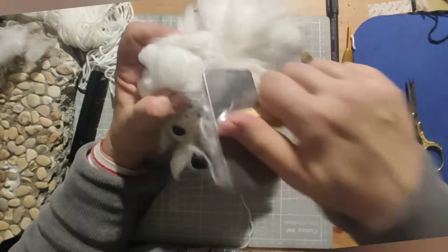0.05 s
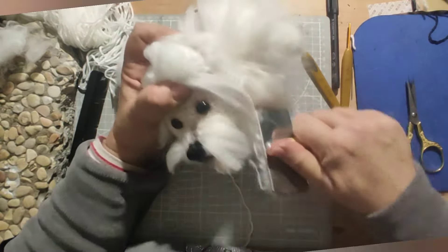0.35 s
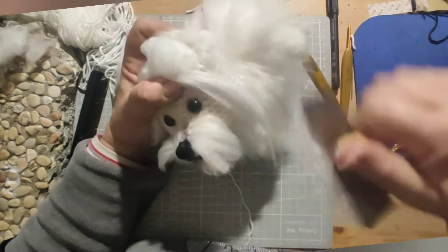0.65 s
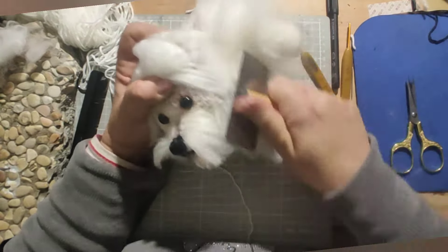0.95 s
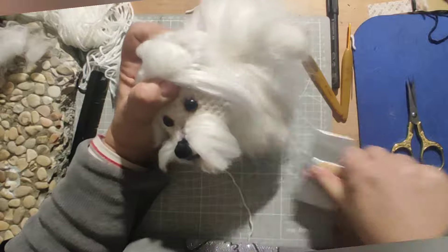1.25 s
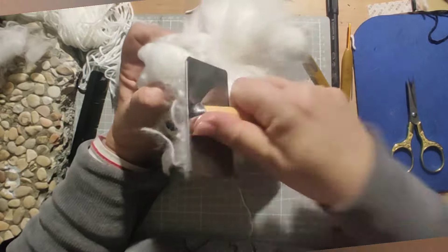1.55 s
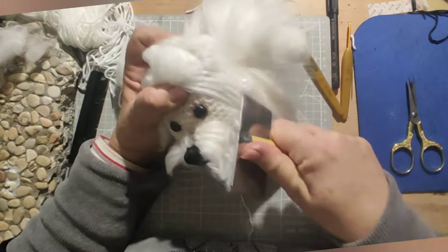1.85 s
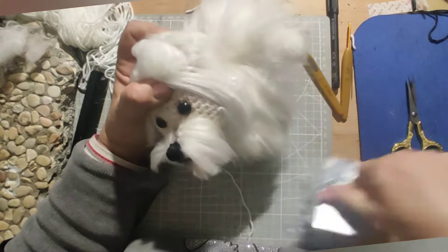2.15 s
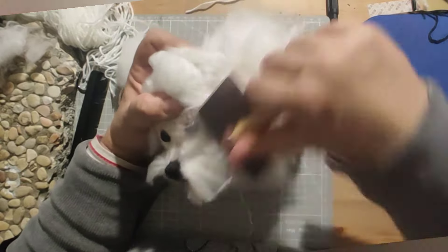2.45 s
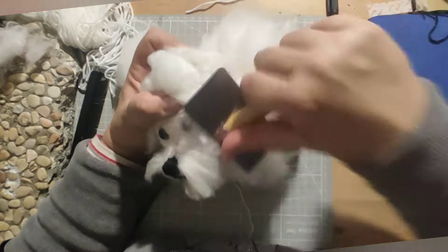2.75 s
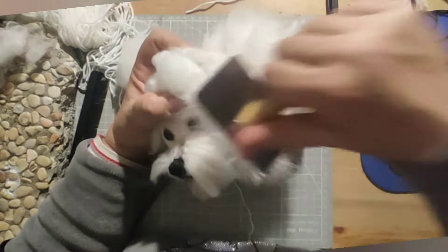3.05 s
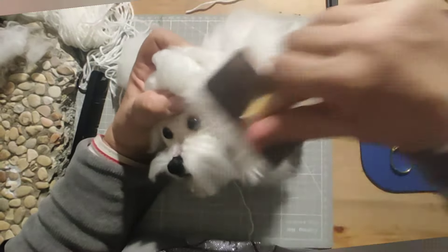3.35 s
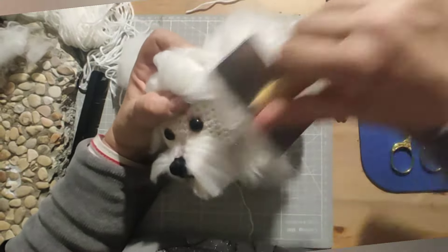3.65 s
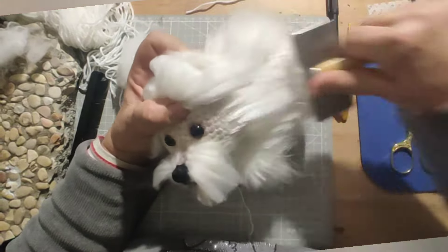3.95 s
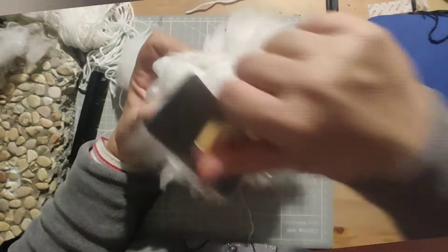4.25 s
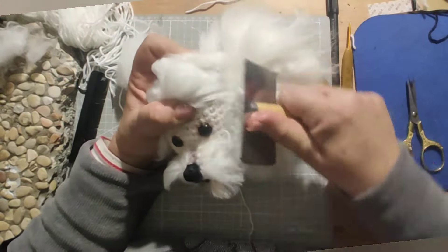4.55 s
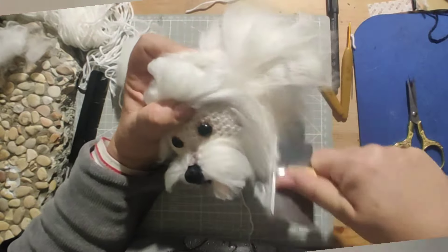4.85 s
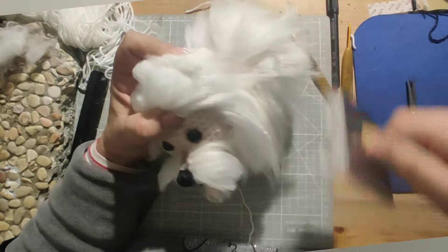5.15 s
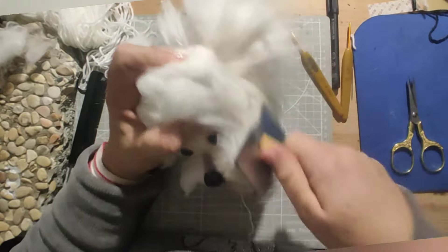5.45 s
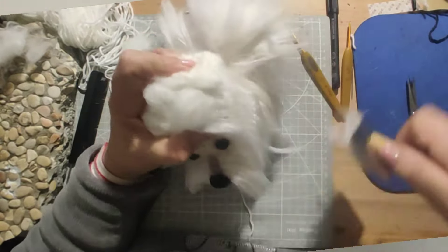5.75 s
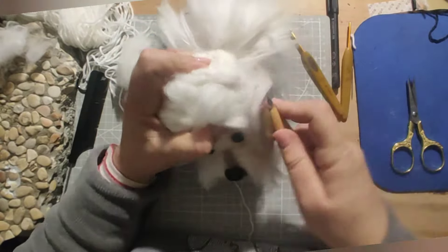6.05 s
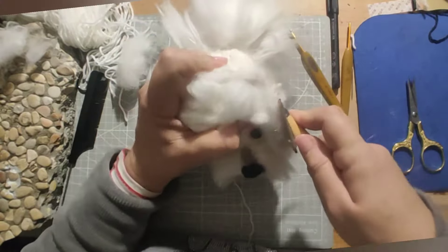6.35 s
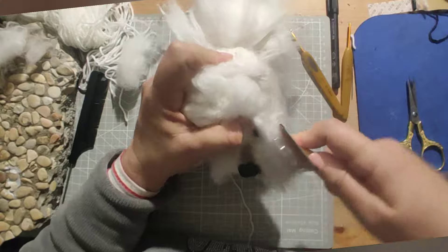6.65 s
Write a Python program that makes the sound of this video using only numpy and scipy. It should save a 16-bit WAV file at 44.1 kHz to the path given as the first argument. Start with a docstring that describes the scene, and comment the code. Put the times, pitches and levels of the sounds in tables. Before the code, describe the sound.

A wire brush rakes again and again through the yarn hair of a toy dog. Each short stroke is a bright, dense crackle over a dry rasp, with tiny snaps as the pins catch and spring free. The strokes are sharpest midway, then turn sparser and lighter. Between them, yarn rustles in the hand and a sleeve swishes softly. The microphone is close, in a small room with a faint fan hum.

```python
"""Slicker brush on a toy dog

Close above a table in a small room, a wire brush rakes again and again through a toy's yarn hair.
Hundreds of pins catch and release fibres: a dense crackle over a rasp, with snaps where a strand holds.
Yarn rustles in the hand, a sleeve swishes and a fan hums; the microphone's two ports ring near 8 kHz."""
import sys
import numpy as np
from scipy import signal
from scipy.fft import rfft, irfft
from scipy.io import wavfile
from scipy.ndimage import uniform_filter1d

SR = 44100
rng = np.random.default_rng(int(sys.argv[2]) if len(sys.argv) > 2 else 0)


def inscribe(sig):
    """Save sig as 16-bit PCM at rate SR to the path in sys.argv[1].

    A 1-D sig is mono; a 2-D sig holds one channel per row.
    Samples are clipped to [-1, 1] before scaling.
    """
    pcm = np.round(np.clip(np.atleast_2d(sig).T, -1, 1) * 32767)
    wavfile.write(sys.argv[1], SR, pcm.astype(np.int16))


N = 300321
TIME = np.arange(N) / SR
STEPS = np.arange(0, N / SR + .002, .001)  # millisecond grid for the strokes
FFT_SIZE = 307200
FREQS = np.maximum(np.arange(FFT_SIZE // 2 + 1) * SR / FFT_SIZE, 1)

# Pulls of the brush. Each row: start and length in seconds, relative level at the bite and at the end
# in dB, run-out in seconds, rasp and pull offsets in dB, wrist speed from 0 (comb) to 1 (flick),
# leftward lean, wire singing offset in dB, seconds the pins take to sink in.
STROKES = [ (0.122, 0.042, -40, -46.5, .018, -6, -12, 0.04, -14, -38, 0.026),
           (0.212, 0.12, -32, -39, 0.12, -2.5, -15, 0.23, -5, -37, 0.037),
           (0.338, 0.11, -38, -44.5, 0.06, -1, -11.5, 0.28, -7, -44, 0.032),
           (0.419, 0.09, -41, -43, 0.017, -9, -10.5, 0.5, -14, -35, 0.027),
           (0.891, 0.11, -34.5, -36.5, 0.07, -9, -15, 0.2, -10.5, -12, 0.027),
           (1.011, 0.23, -45.5, -35.5, 0.03, -6, -10, 0, -11, -26, 0.022),
           (1.141, 0.12, -32.5, -30, 0.041, -11, -21, 0.29, -7, -31, 0.034),
           (1.614, 0.16, -38.5, -38.5, 0.083, -11, -28, 0.07, -9, -5, 0.03),
           (1.763, 0.16, -46.5, -30.5, 0.09, -7, -16.5, 0.25, -8.5, -24, 0.02),
           (1.994, 0.077, -42.5, -43, 0.031, -6, -19, 0, -10, -30, .031),
           (2.489, 0.063, -29.5, -29.5, 0.069, -11, -16.5, 0.75, -9, -26, 0.034),
           (2.818, 0.059, -25, -24, 0.072, -12.5, -17.5, 0.48, 0, -35, 0.03),
           (3.158, 0.065, -26.5, -26, 0.075, -10, -18.5, 0.82, 2.5, -37, .031),
           (3.467, 0.094, -32.5, -27, 0.055, -9.5, -17.5, 0.6, 7, -35, 0.038),
           (3.799, 0.13, -33, -27.5, 0.082, -9.5, -17, 0.5, 5.5, -33, 0.027),
           (4.098, 0.051, -59, -51, 0.036, 2, -9, 0.02, -12, -30, 0.035),
           (4.352, 0.22, -38, -43.5, .04, -6.5, -17.5, 0.1, 1, -2, 0.031),
           (4.483, 0.21, -32.5, -38.5, 0.14, -8.5, -15, 0.1, -5, -6.5, 0.025),
           (4.803, 0.15, -44, -51.5, 0.072, -3, -4.5, 0, -6, -32, 0.022),
           (5.397, .113, -40, -35.5, .09, -7.5, -11.5, .85, -2.5, -36, .031),
           (6.125, 0.19, -61, -39, 0.099, -5, -11.5, 1, 1, -35, 0.023),
           (6.288, 0.19, -45.5, -38.5, 0.047, -7, -13, 0.74, 5, -35, .031),
           (6.433, 0.081, -37.5, -38.5, 0.049, -15, -16.5, 0.55, 3, -35, .031),
           (6.548, 0.1, -34.5, -43, 0.073, -12.5, -11.5, 0.53, 2, -35, 0.045),
           (6.688, 0.12, -60, -45.5, 0.04, -11, -18, 0.8, -10, -35, .031), ]


def from_db(db):
    """Decibels to gain."""
    return 10 ** (np.asarray(db) / 20)


def rms_one(x):
    """Scale to an rms of one."""
    return x / np.sqrt(np.mean(x ** 2) + 1e-20)


def in_time(rows):
    """Each column of a curve at every sample."""
    times, *columns = np.transpose(rows)
    return [np.interp(TIME, times, column) for column in columns]


def over_hz(points):
    """A spectrum table at every frequency."""
    hz, values = np.transpose(points)
    return np.interp(np.log(FREQS), np.log(hz), values)


def white():
    """Two independent white noises."""
    return rng.standard_normal((2, N))


def drift(rate_hz):
    """A smooth random wander with a spread of one."""
    hop, settle = 40, 2000
    pole = np.exp(-2 * np.pi * rate_hz * hop / SR)
    noise = rng.standard_normal(N // hop + settle + 2)
    slow = signal.lfilter([1], [1, -2 * pole, pole * pole], noise)[settle:]
    return np.interp(np.arange(N) / hop, np.arange(len(slow)), rms_one(slow))


def wavering_tone(hz, spread_hz, rate_hz):
    """A sine of rms one whose pitch wanders."""
    return np.sqrt(2) * np.sin(2 * np.pi * np.cumsum(hz + spread_hz * drift(rate_hz)) / SR)


def swell(at_s, half_s):
    """A smooth rise and fall around one moment."""
    return np.exp(-np.minimum(((TIME - at_s) / half_s) ** 2, 30))


def impulses(rows):
    """One impulse for each row of seconds and dB."""
    out = np.zeros(N)
    for at_s, db in rows:
        out[round(at_s * SR)] = from_db(db)
    return out


def narrow_hiss(pitch, width_hz):
    """A thin band of noise that follows a pitch; rms one."""
    lowpass = signal.butter(2, width_hz, fs=SR, output="sos")
    real, imag = signal.sosfilt(lowpass, rng.standard_normal((2, 2, N)))
    return rms_one(np.real((real + 1j * imag) * np.exp(2j * np.pi * np.cumsum(pitch) / SR)))


def panned(db):
    """Left and right gains, the left louder by db, that keep the total power."""
    gains = from_db(np.array([db, -db]) / 2).reshape(2, -1)
    return gains / np.sqrt(np.mean(gains ** 2, axis=0))


def resonance(hz, width_hz, db):
    """Response of one resonant boost."""
    return 1 + (from_db(db) - 1) / (1 + 1j * (FREQS / hz - hz / FREQS) * hz / width_hz)


def port_response(left_lag_s=0.00018):
    """Each microphone port rings at its own pitch; the left one hears the work slightly later."""
    # The left port, then the right. Each row: pitch and width in Hz, boost in dB.
    ports = [(8390, 860, 18), (7473, 700, 22)]
    # Stereo balance. Each row: frequency in Hz, left over right in dB.
    balance = [(60, 5.7), (250, 9.2), (500, 6), (1000, 3.7), (2000, 1.6), (3500, 0.89), (5500, 2),
               (8500, 3.3), (14000, 1.8)]
    response = np.array([resonance(*port) for port in ports]) * panned(over_hz(balance))
    response[0] *= np.exp(-2j * np.pi * FREQS * left_lag_s)
    return response


def pickup(pair, spectrum):
    """Colour a shared and an unshared signal and hear them through the two ports; mid rms one."""
    # How alike the ports hear. Each row: frequency in Hz, likeness from 0 to 1.
    likeness = [(100, 0.62), (500, 0.71), (2000, 0.86), (7500, 0.066), (14000, 0.08)]
    alike = over_hz(likeness)
    shared, apart = rfft(pair, FFT_SIZE)
    sides = np.sqrt(1 + alike) * shared + np.sqrt(1 - alike) * apart * [[1], [-1]]
    out = irfft(sides * port_response() * from_db(over_hz(spectrum)), FFT_SIZE)[:, :N]
    return out / np.std(out.mean(axis=0))


def fan():
    """A fan off to the left: low noise and wavering tones."""
    # Its noise, then its tones. Each row: frequency in Hz, relative level in dB.
    colour = [(29, -40), (50, -28), (102, -19), (193, 0), (226, 0), (257, -4.5), (280, -3.5), (356, -4),
              (388, -16.5), (501, -5), (538, -10), (837, -23), (1050, -24.5), (1260, -18), (1500, -43),
              (1950, -28), (3300, -120)]
    tones = [(258.4, -62.5), (511.4, -70), (1109, -96)]
    noise = from_db(-58.5) * pickup(white(), colour)
    hum = sum(from_db(db + drift(1)) * wavering_tone(hz, spread_hz=2.69, rate_hz=9.3)
              for hz, db in tones)
    return noise + from_db(1.5) * hum * panned(10)


def air(draught_db=-68.5, half_puff_s=0.063):
    """Air stirs at the microphone, and the hand pushes puffs at it."""
    # Puffs. Each row: time in seconds, relative level in dB.
    puffs = [(2.55, -55), (2.925, -49), (3.265, -49), (3.53, -56), (3.825, -52), (3.99, -47), (5.765, -63)]
    # Their rumble. Each row: frequency in Hz, relative level in dB.
    colour = [(10, 4), (22, -10), (42, 1), (60, -6.5), (90, -19), (200, -12), (1000, -87)]
    gusts = sum(from_db(db) * swell(at_s, half_puff_s) for at_s, db in puffs)
    return (from_db(draught_db) + from_db(-8.5) * gusts) * pickup(white(), colour)


def crackle(per_s, spread_db, hiss):
    """Fibres slip off pins at random, with uneven strength, over smooth friction."""
    slips = rng.random((2, N)) < per_s / SR
    sizes = from_db(spread_db * np.minimum(rng.exponential(1, (2, N)), 4))
    signs = rng.choice([-1, 1], (2, N))
    return rms_one(slips * sizes * signs / np.sqrt(per_s)) + hiss * white()


def yarn_rustle():
    """Loose fibres rub softly under the fingers of the holding hand."""
    # The yarn shifting. Each row: time in seconds, level in dB.
    levels = [(0, -63.5), (.55, -50.5), (1.55, -55.5), (2.45, -54), (2.72, -65.5), (2.8, -77), (3.0, -56),
              (3.3, -55), (3.42, -65.5), (4.1, -53.5), (4.32, -65.5), (4.8, -51.5), (5.08, -76),
              (5.33, -61), (5.68, -55.5), (5.97, -62.5), (6.1, -63), (6.81, -52)]
    # Its rustle. Each row: frequency in Hz, relative level in dB.
    colour = [(300, 11), (750, 15), (1300, 14.5), (2500, 13), (4200, 8.5), (6000, 7.5), (7800, 1.5),
              (9400, 1), (10800, -18), (13000, -8), (15000, -37)]
    gain = from_db(in_time(levels)[0] + 1.7 * drift(16))
    return gain * pickup(crackle(1500, spread_db=5, hiss=3), colour)


def stroke_db(build_db, tips_db):
    """Level of each stroke: the pins graze, bite, drag, let go and run out through the loose tips."""
    graze_s, graze_db = 0.015, -23.5
    let_go_db_per_s, run_out_fall_db = 754, 11.5
    start, length, first_db, last_db, run_out, _, _, flick, _, _, bite_s = np.array(STROKES).T[..., None]
    age = STEPS - start
    after = np.maximum(age - length, 0)
    done = np.clip(age / length, 0, 1)
    graze = from_db(graze_db) * flick * (age > -graze_s)
    bite = (np.maximum(age, 0) / bite_s) ** 2
    attack = 20 * np.log10(np.minimum(graze + bite, 1) + 1e-6)
    drag = first_db + (last_db - first_db) * done + build_db * (done - .5)
    release = np.maximum(-let_go_db_per_s * after, tips_db - run_out_fall_db * (after / run_out) ** 2)
    return np.maximum(attack + drag + release, -200)


def stroke_controls():
    """Four gains, wrist speed and lean; the pull builds as the yarn tightens, dull sounds linger."""
    start, length, _, _, _, rasp_db, pull_db, flick, lean, sing_db, _ = np.array(STROKES).T[..., None]
    scratch = from_db(stroke_db(build_db=0, tips_db=-13))
    rasp = from_db(stroke_db(build_db=0, tips_db=-5) + rasp_db)
    pull = from_db(stroke_db(build_db=5, tips_db=-3) + pull_db)
    singing = scratch * from_db(sing_db)
    leaving = np.clip((STEPS - start) / length - .5, 0, 1)
    lean = lean + 6 * (leaving - .2)  # swings left as the brush leaves the tuft
    share = scratch ** 2 / np.sum(scratch ** 2, axis=0)  # the loudest stroke leads
    gains = [gain.max(axis=0) for gain in (scratch, rasp, pull, singing)]
    motion = [np.sum(share * value, axis=0) for value in (flick, lean)]
    return [np.interp(TIME, STEPS, control) for control in gains + motion]


def brushing(scratch_gain, rasp_gain, pull_gain, flick, lean):
    """A harder stroke frees more fibres a second; a quicker one is denser and brighter."""
    # Slow and quick pin scratch, fibre rasp and pull on the tuft.
    # Each row: frequency in Hz, relative level in dB.
    slow_colour = [(2500, -61), (4500, -7), (5600, -2.5), (6800, 8.5), (8500, 3.5), (9400, -2),
                   (10800, -91), (12500, -27), (15000, -39)]
    quick_colour = [(2500, -34.5), (4500, -56), (5600, -34), (6800, 8), (8500, 9), (9400, 4.5), (10200, -7),
                    (11000, -20), (15000, -10)]
    rasp_colour = [(700, -36), (1300, -4), (2100, -1.5), (2600, 2.5), (3500, -0.5), (4600, -3),
                   (6000, -5.5), (9000, -33)]
    pull_colour = [(100, -16), (250, 1), (480, 0), (800, 2), (1200, -5), (1800, -47), (4000, -33)]
    per_s = 2200 * (1 + flick) * np.maximum(scratch_gain / from_db(-35.5), .03) ** .6
    slips = crackle(per_s, spread_db=1.6, hiss=0.35)
    clumps = from_db(1.3 * drift(110) + 0.6 * drift(12))  # rows of pins bite together
    pins = (1 - flick) * pickup(slips, slow_colour) + flick * pickup(slips, quick_colour)
    scratch = scratch_gain * from_db(-4) * pins * panned(0.63 * lean + 0.71)
    rasp = rasp_gain * from_db(-1) * pickup(slips + 0.48 * white(), rasp_colour) * panned(0.038 * lean)
    pull = pull_gain * from_db(-5) * pickup(slips + 1.33 * white(), pull_colour)
    return clumps * (scratch + rasp + pull)


def wires(singing):
    """Pins bent by a taut strand ring together near 6 kHz."""
    # Their ring. Each row: frequency in Hz, relative level in dB.
    colour = [(4600, -42), (5500, 2), (6100, 8), (6600, 3), (7200, 1.5), (8200, -22), (11000, -55)]
    return singing * pickup(crackle(2200, spread_db=-3, hiss=0.21), colour)


def changing_pins(x, depth_db):
    """Other pins touch from moment to moment, so narrow bands swell and fade."""
    cells = signal.stft(x, nperseg=256)[2]
    flicker = uniform_filter1d(rng.standard_normal(cells.shape[1:]), size=14, axis=1)
    flicker = rms_one(uniform_filter1d(flicker, size=3, axis=0))
    return signal.istft(cells * rms_one(from_db(depth_db * flicker)))[1][:, :N]


def hollow(x, width_hz=200):
    """The air behind the pin cushion rings at two pitches that move as the brush tilts."""
    # The upper resonance. Each row: time in seconds, pitch in Hz, boost in dB.
    tilts = [(.3, 2300, -1), (1.2, 2200, 4), (1.9, 2040, 4), (2.55, 2150, 4.5), (2.87, 2100, 6),
             (3.22, 2260, 5), (3.55, 1900, 7.5), (3.9, 1930, 2), (4.5, 2150, 5), (6.4, 2850, 3)]
    hz, boost_db = in_time(tilts)
    for pitch_ratio, boost_share in (1, 1), (0.627, 0.5):
        turn = np.exp(2j * np.pi * np.cumsum(pitch_ratio * hz) / SR)
        pole = np.exp(-np.pi * pitch_ratio * width_hz / SR)
        ring = 2 * np.real(turn * signal.lfilter([1 - pole], [1, -pole], x / turn + 1e-18))
        x = x + (from_db(boost_share * boost_db) - 1) * ring
    return x


def tearing(scratch_gain):
    """Hard pulls break fibres, which adds a fine bright fizz."""
    # The fizz. Each row: frequency in Hz, relative level in dB.
    colour = [(5000, -30), (8500, 4), (9600, 4), (10800, -19), (12500, -4), (15000, 0)]
    force = scratch_gain / from_db(-30)
    return from_db(-65) * force ** 2.4 * pickup(crackle(1500, spread_db=5, hiss=.2), colour)


def brush_head(x):
    """The plate that carries the pins colours their scratch."""
    # Its resonances. Each row: pitch and width in Hz, boost in dB.
    modes = [(600, 70, 3), (1090, 150, 3.5), (1780, 95, 1.5), (2146, 40, 3), (3060, 120, 1),
             (4120, 85, 2.5), (5300, 70, 1.5), (5620, 120, 1)]
    response = np.prod([resonance(*mode) for mode in modes], axis=0)
    return irfft(rfft(x, FFT_SIZE) * response, FFT_SIZE)[:, :N]


def near_echoes(x, table_s, table_db, hand_s, hand_db, sway):
    """Table and hand throw the sound back along paths that change as the brush moves."""
    out = x.copy()
    for lag_s, db in (table_s, table_db), (hand_s, hand_db):
        path_s = lag_s * (1 + sway * drift(0.23))
        for side in range(2):
            delay_s = path_s * (1 + sway * drift(0.226))
            out[side] += from_db(db) * np.interp(TIME - delay_s, TIME, x[side])
    return out / np.sqrt(1 + from_db(table_db) ** 2 + from_db(hand_db) ** 2)


def chatter(hits, spectrum, rise_s, lead_db=14, window_s=.005, crest_db=4.8):
    """Each impulse becomes one sharp contact and a few milliseconds of tiny ones."""
    age = TIME[TIME < 10 * rise_s] / rise_s
    envelope = np.convolve(hits, age * np.exp(1 - age))[:N]
    first_contact = from_db(lead_db) * hits * [[1], [0]]
    burst = pickup(first_contact + envelope * rng.choice([-1, 1], (2, N)), spectrum)
    # hold each burst to the strength of its impulse
    powers = np.array([envelope, burst.mean(axis=0)]) ** 2
    envelope_power, burst_power = np.abs(uniform_filter1d(powers, size=round(window_s * SR)))
    return burst * np.sqrt(envelope_power / (burst_power + 1e-6)) * from_db(-crest_db)


def snaps(holding, pan_db, snags_per_s=100):
    """A caught pin springs back and jostles its neighbours; lesser snags come while the yarn holds."""
    # Pins snapping free. Each row: time in seconds, level in dB.
    releases = [(.1462, -29), (.1558, -28), (.1873, -41), (.2222, -35), (.2375, -29), (.2422, -25),
                (.2488, -25), (.2665, -25), (.2896, -24), (.3107, -27), (.3222, -27), (.3327, -25),
                (.3425, -30), (.3727, -30), (.3994, -26), (.4231, -26), (.4272, -28), (.4553, -26),
                (.4649, -25), (.4786, -30), (.5033, -25), (.5126, -26), (.665, -33), (.9003, -31),
                (.9132, -29), (.9174, -25), (.9301, -25), (.9427, -25), (.9749, -26), (1.0369, -30),
                (1.0482, -28), (1.083, -29), (1.1138, -27), (1.124, -26), (1.1485, -27), (1.1724, -24),
                (1.1845, -24), (1.2662, -23), (1.636, -31), (1.659, -28), (1.6838, -27), (1.692, -26),
                (1.695, -26), (1.7123, -23), (1.7191, -24), (1.7313, -19), (1.7633, -27), (1.829, -26),
                (1.8347, -26), (1.8833, -24), (1.9334, -24), (1.958, -30), (2.0182, -27), (2.0382, -31),
                (2.048, -29), (2.058, -29), (2.079, -33), (2.507, -32), (2.5124, -27), (2.5341, -22),
                (2.83, -29), (2.8355, -25), (2.8575, -18), (2.8725, -18), (3.1802, -22), (3.1876, -22),
                (3.462, -45), (3.4845, -31), (3.4974, -25), (3.5022, -23), (3.5549, -20), (3.7926, -35),
                (3.8167, -28), (3.8447, -23), (3.867, -20), (3.904, -21), (4.1563, -35), (4.365, -33),
                (4.389, -25), (4.3938, -24), (4.4139, -24), (4.433, -23), (4.4402, -22), (4.45, -27),
                (4.4776, -20), (4.5022, -20), (4.518, -22), (4.5403, -22), (4.5517, -22), (4.5786, -23),
                (4.821, -30), (4.8532, -27), (4.8672, -29), (4.879, -34), (4.8858, -26), (4.8982, -24),
                (4.919, -32), (4.9393, -28), (4.9505, -30), (5.4245, -34), (5.4932, -29), (6.2617, -32),
                (6.2865, -29), (6.3047, -30), (6.3593, -29), (6.3778, -32), (6.4998, -30), (6.5404, -37),
                (6.583, -29.5), (6.6105, -26), (6.628, -27), (6.6318, -29), (6.645, -30)]
    # One pin's tick. Each row: frequency in Hz, relative level in dB.
    colour = [(600, -4), (2000, 4), (3500, 6), (6000, 4), (7500, 8), (9000, 0), (10500, -19), (15000, -24)]
    snag_db = 5 + 2 * np.clip(rng.standard_normal(N), -2, 2)
    snags = (rng.random(N) < snags_per_s / SR) * holding * from_db(snag_db)
    return chatter(snags + impulses(releases), colour, rise_s=.0004) * panned(pan_db)


def drone():
    """A low drone swells twice on the left."""
    # Swells. Each row: peak time and half length in seconds, level in dB.
    swells = [(0.456, 0.13, -59.5), (5.73, 0.073, -68)]
    # Partials. Each row: pitch in Hz, relative level in dB.
    partials = [(86, 2.5), (163, -1)]
    gain = sum(from_db(db) * swell(at_s, half_s) for at_s, half_s, db in swells)
    tones = sum(from_db(db) * wavering_tone(hz, spread_hz=4, rate_hz=14.6) for hz, db in partials)
    return gain * tones * panned(10)


def sleeve_swishes(pitch_sag=0.011):
    """The sleeve rubs hollowly, and its weave hisses at a pitch that follows the speed of the arm."""
    # Back swings. Each row: middle and half length in seconds, hiss in dB, pitch in Hz, rub in dB.
    swings = [(0.62, 0.26, -61, 4500, -55.5), (1.457, 0.17, -53, 4180, -64), (2.327, 0.2, -66, 4480, -60),
              (3.053, 0.12, -59.5, 4150, -63), (3.36, 0.053, -60, 4240, -62),
              (5.725, .13, -61.5, 4700, -64)]
    # The rub. Each row: frequency in Hz, relative level in dB.
    colour = [(250, -25), (490, 10), (620, -2.5), (820, 9.5), (1050, -20), (2800, -31), (4000, -27)]
    hiss_gain = sum(from_db(db) * swell(at_s, half_s) for at_s, half_s, db, _, _ in swings)
    rub_gain = sum(from_db(db) * swell(at_s, half_s) for at_s, half_s, _, _, db in swings)
    pitch, = in_time([(at_s + place * half_s, hz * (1 - pitch_sag * place ** 2))
                      for at_s, half_s, _, hz, _ in swings for place in np.linspace(-1, 1, 5)])
    return rub_gain * pickup(white(), colour) + hiss_gain * narrow_hiss(pitch, width_hz=310)


def frame_clicks():
    """The frame of the brush clicks against something hard."""
    # Contacts. Each row: time in seconds, level in dB.
    contacts = [(2.8055, -43), (3.4563, -42), (5.3963, -33.5), (6.0185, -33), (6.0402, -40)]
    # The click. Each row: frequency in Hz, relative level in dB.
    colour = [(600, -6), (1500, 5), (2800, 14), (4000, 12), (6000, 7), (7500, 1), (9500, 1), (11000, -4),
              (15000, -14)]
    return chatter(impulses(contacts), colour, rise_s=.0005)


def sleeve_squeak():
    """The sleeve squeaks faintly as the arm speeds up: two thin partials rise together."""
    # The glide. Each row: time in seconds, pitch in Hz, level in dB.
    glide = [(5.2, 4150, -89), (5.245, 4500, -69), (5.29, 4680, -68), (5.36, 5000, -66), (5.385, 4800, -66),
             (5.41, 4800, -90)]
    # Partials. Each row: multiple of the pitch, relative level in dB.
    partials = [(1, 2), (1.23, 0)]
    pitch, db = in_time(glide)
    sounding = (TIME > glide[0][0]) & (TIME < glide[-1][0])
    return sounding * sum(from_db(db + partial_db) * narrow_hiss(multiple * pitch, width_hz=160)
                          for multiple, partial_db in partials)


def sleeve_drag():
    """The sleeve drags over the table on the right."""
    # The drag. Each row: time in seconds, level in dB.
    levels = [(0, -100), (6.15, -100), (6.32, -61), (6.55, -57), (6.72, -55), (6.81, -54.5)]
    # Cloth on the table. Each row: frequency in Hz, relative level in dB.
    colour = [(300, -14.5), (800, -5), (1200, 0), (1500, 11.5), (1800, 2), (2600, 2), (5000, -52)]
    return from_db(in_time(levels)[0]) * pickup(white(), colour) * panned(-4)


def table_bump(decay_s=0.012):
    """The table answers a touch with a short dull thud."""
    # The touch. Each row: time in seconds, relative level in dB.
    touches = [(6.327, -44)]
    # The table's low modes. Each row: pitch in Hz, relative level in dB.
    modes = [(82, 1), (128, 1), (215, -1)]
    ringing = sum(from_db(db) * np.sin(2 * np.pi * hz * TIME) for hz, db in modes)
    thud = ringing * np.exp(-TIME / decay_s)
    return signal.fftconvolve(impulses(touches), thud)[:N] * panned(5.4)


def room(x, t60_s=0.2):
    """The small room adds a short diffuse tail, different at each port."""
    tail = white() * from_db(-60 * TIME / t60_s) * (TIME > .003)
    tail /= np.sqrt(np.sum(tail ** 2, axis=1, keepdims=True))
    return signal.fftconvolve(x, tail[:, :SR], axes=1)[:, :N]


def scene():
    """The brush close to the microphone, hand and sleeve around it, the quiet room behind."""
    scratch, rasp, pull, singing, flick, lean = stroke_controls()
    ticks = snaps(holding=(1 - flick) * scratch, pan_db=.5 * lean) + frame_clicks()
    brush = brushing(scratch, rasp, pull, flick, lean) + wires(singing)
    brush = changing_pins(brush, depth_db=2.5)
    brush = brush_head(hollow(brush) + tearing(scratch))
    brush = near_echoes(brush, table_s=.0018, table_db=-10, hand_s=.0042, hand_db=-7, sway=0.0648)
    brush += ticks
    reverb = from_db(-11.5) * room(brush)
    handling = yarn_rustle() + from_db(-4.5) * table_bump()
    sleeve = sleeve_drag() + sleeve_swishes() + sleeve_squeak()
    return brush + reverb + handling + sleeve + fan() + drone() + air()


def record(dry, cutoff_hz=15200):
    """The top is cut steeply."""
    lowpass = 1 / np.sqrt(1 + (FREQS / cutoff_hz) ** 200)
    return irfft(rfft(dry, FFT_SIZE) * lowpass, FFT_SIZE)[:, :N]


dry = scene()
out = record(dry)
inscribe(out)
```